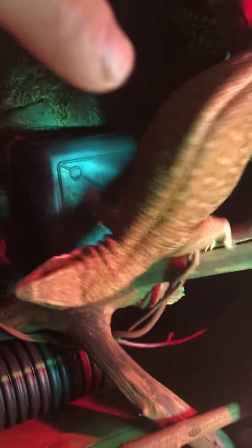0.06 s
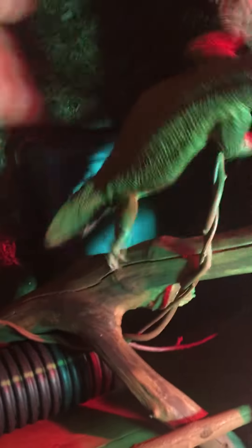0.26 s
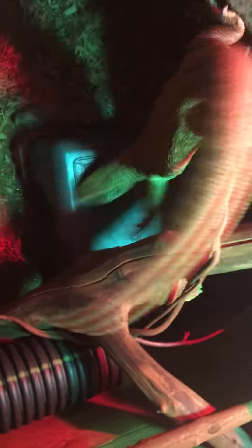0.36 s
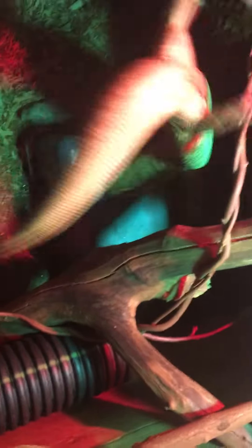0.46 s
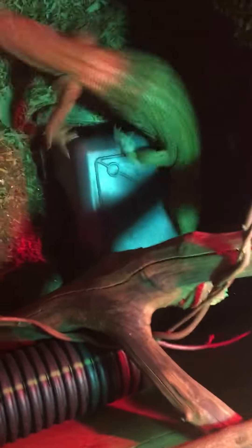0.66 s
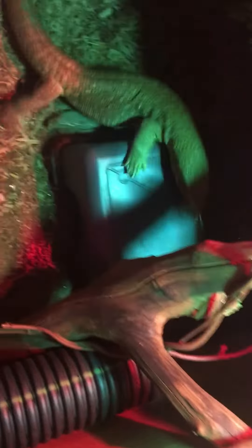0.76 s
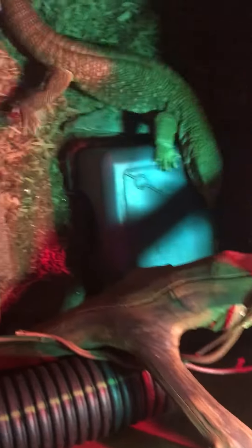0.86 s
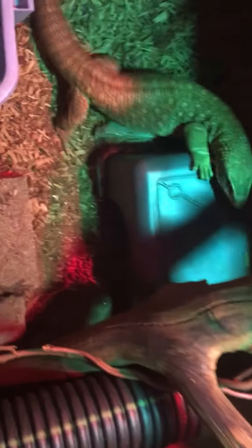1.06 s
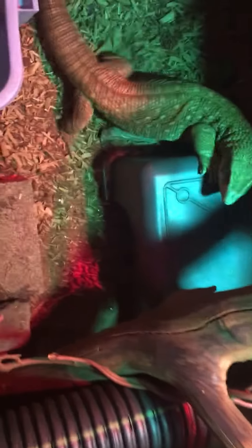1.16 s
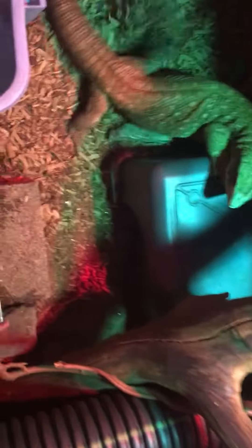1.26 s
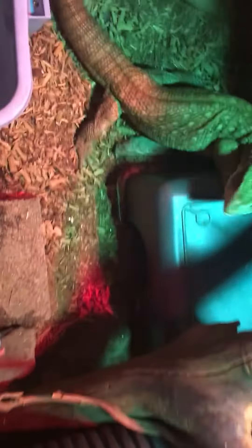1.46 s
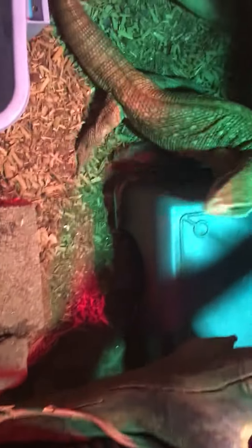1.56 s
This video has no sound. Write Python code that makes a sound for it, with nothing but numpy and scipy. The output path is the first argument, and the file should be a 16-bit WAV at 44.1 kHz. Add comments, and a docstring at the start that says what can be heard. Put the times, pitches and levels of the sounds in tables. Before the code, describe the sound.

A large lizard scuffles on a branch, scales rasping and claws ticking, then drops onto wood chips with a crunch and a dull thump. It settles with faint rustles, heard close up in an indoor enclosure.

```python
"""A large lizard scrabbles off a branch, tumbles onto wood chips and settles, heard close up on one
microphone in an indoor enclosure. Its scales rasp, its belly and tail rub, claws tick and feet knock
on the branch. Chips crunch under each limb, and the body's landing makes the floor boom.
Close walls add a short ring; behind it all lies room tone, a faint hum and hiss."""
import sys
import numpy as np
from scipy import signal
from scipy.fft import rfft, irfft
from scipy.io import wavfile

SR = 44100
rng = np.random.default_rng(int(sys.argv[2]) if len(sys.argv) > 2 else 0)


def file_out(sig):
    """Save sig as 16-bit WAV at sys.argv[1]."""
    # one column per channel
    cols = np.atleast_2d(sig).T
    # limit, then scale
    lim = np.clip(cols, -1, 1)
    pcm = np.round(lim * 32767).astype(np.int16)
    wavfile.write(sys.argv[1], SR, pcm)


N = 70560
T = np.arange(N) / SR
TOP_HZ = 15950

# midrange spectrum of scraped and cracking wood: frequency_hz, gain_db
WOOD_MID_TONE = [(400, -25), (800, -5.5), (1200, -0.5), (1600, -1.5), (2200, -1.5), (2900, -5), (4000, -6),
                 (8000, -41)]


def scales():
    """Scales catch and slip on bark and chips in an uneven stream of grains."""
    # course of the rasp: time_s, low_db, mid_db, treble_db
    rasp_levels = [(0, -46, -48.5, -51), (.12, -44.5, -45.5, -47), (.165, -37.5, -46, -41),
                   (.19, -39.5, -43.5, -44.5), (.25, -40.5, -40.5, -40.5), (.29, -37.5, -47.5, -55.5),
                   (.32, -63, -45.5, -41.5), (.36, -43, -41.5, -45), (.395, -49.5, -57, -49.5),
                   (.44, -39.5, -42, -42.5), (.51, -49.5, -50.5, -41), (.585, -52, -48.5, -42),
                   (.62, -44.5, -38, -53), (.66, -33.5, -34.5, -52), (.683, -40, -40.5, -37.5),
                   (.738, -41.5, -39, -46.5), (.80, -42, -43, -45), (.83, -48.5, -45, -61),
                   (.88, -53, -52.5, -62), (.95, -62, -63, -58), (1.06, -59, -56.5, -55.5),
                   (1.19, -67, -63, -59.5), (1.26, -62, -57.5, -52), (1.34, -71, -60, -53),
                   (1.44, -55.5, -57.5, -53.5), (1.6, -57, -54, -48)]
    # spectra of its lows and treble: frequency_hz, gain_db
    low_tone = [(90, -16), (170, 0), (250, 3), (400, -1.5), (650, -3), (900, -5), (1500, -31.5),
                (3000, -75)]
    treble_tone = [(1500, -37), (2800, -3), (3900, -1.5), (5000, 0), (7000, -1), (9500, 1.5), (10500, -3.5),
                   (12000, 1.5), (16000, -11.5)]
    slips = amp(2.0 * wander(per_s=80))
    rasp = np.zeros(N)
    for column, (tone, trim_db) in enumerate([(low_tone, 0), (WOOD_MID_TONE, .5), (treble_tone, .5)], 1):
        friction = colour(grains(per_s=2600, spread_db=-1), tone)
        rasp += amp(trim_db) * curve(rasp_levels, column) * friction
    return slips * rasp


def rubs():
    """Belly and tail stick and slip on wood, and the branch judders low; each stroke is one wavering tone that
    swells and fades."""
    # strokes: start_s, length_s, level_db, pitch_hz; the two low ones are the branch juddering
    strokes = [(0.14, 0.087, -39, 92), (0.2106, 0.08, -38.5, 92), (0.19, 0.15, -43, 1372),
               (0.26, 0.042, -35, 650), (0.999, 0.1, -56.5, 1110)]
    pitch_wobble, flutter_db = .1, 3.5
    out = np.zeros(N)
    for start, length, db, hz in strokes:
        wobbles_per_s = hz / 4
        phase = 2 * np.pi * np.cumsum(hz * (1 + pitch_wobble * wander(wobbles_per_s))) / SR
        swell = 2 * np.sin(np.pi * np.clip((T - start) / length, 0, 1))
        out += amp(db + flutter_db * wander(wobbles_per_s)) * swell * np.sin(phase)
    return out


def chips():
    """Chips crushed by limbs, belly and tail give dying bursts of thuds, cracks and splinters."""
    # contacts: start_s, thud_db, crack_db, splinter_db, attack_s, decay_s
    crunches = [(.13, -56, -34, -54, 0.015, 0.037), (0.209, -56, -32.5, -33.5, 0.00045, 0.015),
                (0.236, -34.5, -40, -42, 0.0017, 0.032), (0.302, -31.5, -30.5, -32.5, 0.00079, 0.0075),
                (0.3338, -36, -42, -46, .0003, 0.023), (0.435, -41, -32.5, -30.5, 0.011, 0.029),
                (0.6014, -28.5, -26, -25, 0.00017, 0.018), (0.6167, -54, -42, -31, 0.00016, 0.016),
                (0.639, -53, -33.5, -34, 0.0035, 0.025), (0.6895, -25.5, -31, -22.5, 0.0016, 0.012),
                (0.7197, -24.5, -23, -23, 0.0081, 0.012), (0.732, -37, -30, -37, 0.00078, 0.0067),
                (0.755, -24.5, -54, -32, 0.00034, 0.0074), (0.769, -36.5, -25.5, -34.5, 0.00023, 0.016),
                (0.807, -35.5, -28.5, -32.5, 0.00093, 0.023), (0.897, -76, -45, -41, 0.0046, 0.019),
                (1.024, -48, -78, -51, 0.011, 0.041), (1.292, -41, -45.5, -62, 0.011, 0.02),
                (1.5279, -45.5, -37, -39.5, 0.00019, 0.019)]
    # spectra of thuds and splinters: frequency_hz, gain_db
    thud_tone = [(100, -18.5), (200, -8), (380, 2), (650, 0.5), (900, -5), (1500, -36), (3000, -62)]
    splinter_tone = [(1500, -40), (2800, -2), (3900, 6.5), (5000, 4.5), (6500, 3.5), (9500, 1),
                     (10500, -5.5), (12000, -2.5), (16000, -14)]
    crunch = np.zeros(N)
    for k, tone in enumerate([thud_tone, WOOD_MID_TONE, splinter_tone]):
        pressure = sum(at(amp(levels_db[k]) * np.exp(-T / decay) * (1 - np.exp(-T / attack)), start)
                       for start, *levels_db, attack, decay in crunches)
        crunch += pressure * colour(grains(per_s=3500, spread_db=.5), tone)
    quick_catches = unit(amp(1.5 * wander(per_s=400)))
    return crunch * quick_catches


def landings():
    """Limbs land with a dull, quickly damped pat, and single dry chips crack under the weight."""
    # soft limbs on the bedding: start_s, level_db, pitch_hz, decay_s
    slaps = [(0.6037, -15, 205, 0.0032), (0.6138, -25, 250, 0.0071), (0.733, -16, 271, 0.0034),
             (1.303, -41.5, 129, 0.0097)]
    # chips breaking: start_s, level_db, brightness_hz
    breaks = [(0.6056, -17, 4000), (0.7678, -15, 2000), (0.8105, -12, 4470), (1.5308, -28, 3000)]
    # modes of a chip: pitch_hz, level_db, t60_s
    chip_modes = [(1410, -26, 0.029), (1894, -4, 0.027), (2276, -1.5, 0.02), (2600, -9, .02),
                  (2966, -7, 0.0057), (4140, -10, .009)]
    pats = sum(amp(db) * at(np.sin(2 * np.pi * hz * T) * np.exp(-T / decay), start)
               for start, db, hz, decay in slaps)
    cracks = sum(amp(db) * at(ring(chip_modes, hz, scatter_db=4.5), start) for start, db, hz in breaks)
    return pats + cracks


def claws():
    """Claws pluck twigs, which ping; claws and splinters snap in short bursts of noise."""
    # plucks: start_s, level_db, brightness_hz
    plucks = [(.209, -31.5, 9000)]
    # modes of the twigs: pitch_hz, level_db, t60_s
    twig_modes = [(2410, 0, 0.13), (3490, -0.5, 0.11), (4050, 11, 0.023), (6660, 4.5, 0.058)]
    # snaps: start_s, level_db, pitch_hz, decay_s
    ticks = [(0.0326, -35.5, 8800, 0.0027), (0.207, -24.5, 9700, .0015), (0.2996, -23, 8800, 0.0034),
             (.3352, -24.5, 1360, 0.0022), (0.4255, -26.5, 9350, 0.0022), (.6018, -20, 5460, .001),
             (.618, -21.5, 6900, 0.0013), (0.6594, -26, 8060, 0.00072), (.7265, -19.5, 6840, 0.00086),
             (.769, -20.5, 8100, 0.00048), (0.8101, -18, 5800, 0.001), (1.036, -40.5, 9050, .003),
             (1.273, -43.5, 4100, 0.003), (1.432, -40, 5800, 0.0022), (1.531, -28.5, 3540, 0.0018),
             (1.566, -37, 8300, .0013)]
    out = sum(amp(db) * at(ring(twig_modes, hz), start) for start, db, hz in plucks)
    for start, db, hz, decay in ticks:
        edges_hz = [hz / 1.5, min(hz * 1.5, TOP_HZ)]
        snap = unit(band(rng.standard_normal(N), edges_hz, "bandpass")) * np.exp(-T / decay)
        out += amp(db) * at(snap, start)
    return out


def branch():
    """Feet strike the branch, which rings after a gritty attack."""
    # footfalls: start_s, level_db, brightness_hz
    knocks = [(0.3352, -28, 2380), (0.3475, -25, 2460), (.353, -23.5, 1650), (.363, -28, 2100),
              (.372, -23.5, 855), (0.395, -23.5, 326), (1.102, -39, 400)]
    # modes of the branch: pitch_hz, level_db, t60_s
    branch_modes = [(277.2, -10.5, 0.34), (367.6, -3, 0.21), (610, -9, 0.032), (610, -17, 0.04),
                    (786, 0.5, 0.018), (1166, -5, 0.1), (1260, 5.5, 0.015), (1400, -5, 0.049),
                    (1806, -2, 0.076), (2010, -13, 0.065), (2366, -1.5, 0.14)]
    grit_db, grit_decay_s = -6, .0084
    out = np.zeros(N)
    for start, db, hz in knocks:
        wood = ring(branch_modes, hz, scatter_db=4.5, detune=.03)
        grit = unit(band(rng.standard_normal(N), hz, "lowpass")) * np.exp(-T / grit_decay_s)
        out += amp(db) * at(wood / 2 + amp(grit_db) * grit, start)
    return out


def enclosure():
    """The floor booms under the soft body, its pitch sagging as the load eases; the struggle shakes it."""
    # the body's impacts: start_s, level_db, brightness_hz
    thumps = [(0.479, -23.5, 82), (0.7278, -10, 208)]
    # modes of the floor: pitch_hz, level_db, t60_s
    floor_modes = [(34, -16, 1), (66.8, 0.5, 0.45), (103.2, 1, 0.15), (118, -17, 0.049), (176, -3.5, .08),
                   (244.7, -5.5, 0.13)]
    # low shudder of branch and enclosure: time_s, level_db
    shudder_levels = [(0, -44.5), (.13, -57), (.18, -48), (.25, -34.5), (.3, -42), (.45, -37), (.58, -41),
                      (.62, -26.5), (.72, -34.5), (.85, -48), (.99, -40), (1.01, -63), (1.3, -64.5),
                      (1.5, -51), (1.6, -56.5)]
    # its spectrum: frequency_hz, gain_db
    shudder_tone = [(20, -14), (35, -7.5), (55, -2.5), (95, -7), (135, -8), (190, -26), (400, -52.5)]
    rise_s, relax_s, pitch_excess = .0014, .023, .061
    push = 1 - np.exp(-T / rise_s)
    lead_s = pitch_excess * relax_s * (1 - np.exp(-T / relax_s))  # the modes start sharp and settle
    booms = sum(amp(db) * at(push * ring(floor_modes, hz, lead_s=lead_s), start)
                for start, db, hz in thumps)
    shudder = curve(shudder_levels) * colour(rng.standard_normal(N), shudder_tone)
    return band(booms, 41, "highpass") + shudder


def walls(direct):
    """Dense reflections off close walls reach the microphone just after the source; treble dies first."""
    echo_db, delay_s, low_t60_s, treble_t60_s = -11.5, .003, .16, .061
    noise = rng.standard_normal(N)
    tail = band(noise, 2360, "lowpass") * amp(-60 * T / low_t60_s)
    tail += band(noise, 1800, "highpass") * amp(-60 * T / treble_t60_s)
    response = at(tail / np.linalg.norm(tail), delay_s)
    return direct + amp(echo_db) * signal.fftconvolve(direct, response)[:N]


def room_tone():
    """Faint rumble and hiss of the room, with a steady low hum."""
    # spectrum of the room noise: frequency_hz, gain_db
    air_tone = [(20, 15), (45, 25), (72, 40), (110, -26), (300, -11), (1000, 6.5), (3000, -28), (10000, 2),
                (16000, -9)]
    air_db, hum_db, hum_hz = -58, -64.5, 70
    air = colour(rng.standard_normal(N), air_tone)
    hum = unit(np.sin(2 * np.pi * hum_hz * T))
    return amp(air_db) * air + amp(hum_db) * hum


def ring(modes, brightness_hz, scatter_db=0, lead_s=0, detune=0):
    """Struck modes decay; a softer contact weakens the upper ones, and level and tuning can scatter."""
    chance = rng.standard_normal((len(modes), 2))
    out = np.zeros(N)
    for (hz, db, t60), (level_draw, pitch_draw) in zip(modes, chance):
        envelope = amp(db + scatter_db * level_draw - 60 * T / t60)
        phase = 2 * np.pi * hz * (1 + detune * pitch_draw) * (T + lead_s)
        out += envelope * np.sin(phase) / (1 + (hz / brightness_hz) ** 2)
    return out


def grains(per_s, spread_db):
    """Tiny clicks at random times, slightly uneven in size."""
    size = amp(spread_db * np.minimum(rng.exponential(size=N), 4))
    return (rng.random(N) < per_s / SR) * size * rng.choice([-1, 1], N)


def wander(per_s):
    """Smooth random drift with a spread near 1."""
    return np.interp(T * per_s, np.arange(N), rng.standard_normal(N))


def colour(x, tone):
    """Causal filter through (frequency_hz, gain_db) points; the result has an rms of 1."""
    hz, db = np.array(tone).T
    bins_hz = np.maximum(np.fft.rfftfreq(2 * N, 1 / SR), 1)
    gain = amp(np.interp(np.log(bins_hz), np.log(hz), db))
    cepstrum = irfft(np.log(gain))
    cepstrum[1:N] *= 2  # fold onto positive time for minimum phase
    cepstrum[N + 1:] = 0
    return unit(irfft(rfft(x, 2 * N) * np.exp(rfft(cepstrum)))[:N])


def band(x, hz, kind):
    """Butterworth filter."""
    return signal.sosfilt(signal.butter(2, hz, kind, fs=SR, output="sos"), x)


def curve(rows, column=1):
    """Gain over time from a column of dB values."""
    rows = np.array(rows)
    return amp(np.interp(T, rows[:, 0], rows[:, column]))


def at(x, start_s):
    """Delay a sound to its start time."""
    return np.concatenate([np.zeros(int(start_s * SR)), x])[:N]


def amp(db):
    """Decibels to gain."""
    return 10 ** (np.asarray(db) / 20)


def unit(x):
    """Scale to an rms of 1."""
    return x / np.sqrt(np.mean(x ** 2))


def scene():
    """At the microphone: the lizard's contacts ring between the walls, over floor boom and room tone."""
    contacts = scales() + rubs() + chips() + landings() + claws() + branch()
    return (walls(contacts) + enclosure() + room_tone())[None]


def record(dry):
    """The recorder cuts the top steeply."""
    return signal.sosfilt(signal.ellip(10, .2, 80, TOP_HZ, fs=SR, output="sos"), dry)


dry = scene()
out = record(dry)
file_out(out)
```